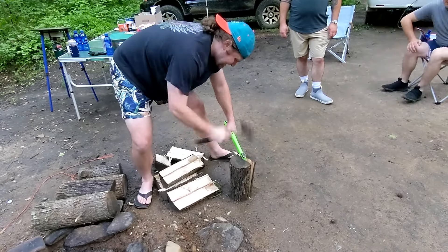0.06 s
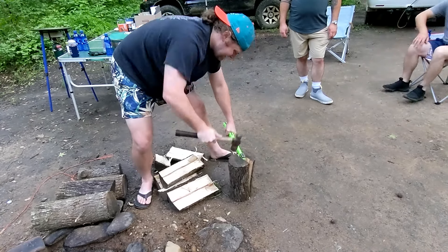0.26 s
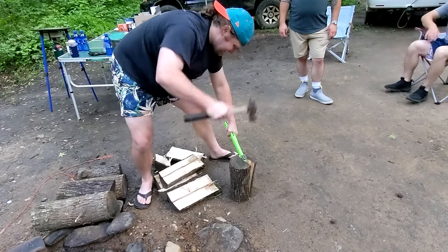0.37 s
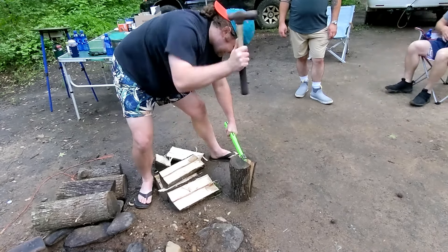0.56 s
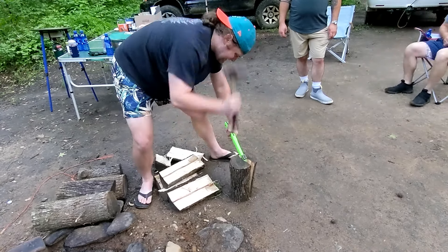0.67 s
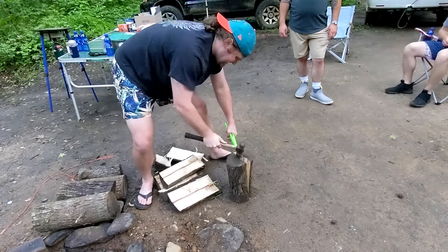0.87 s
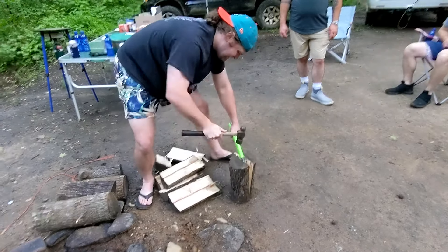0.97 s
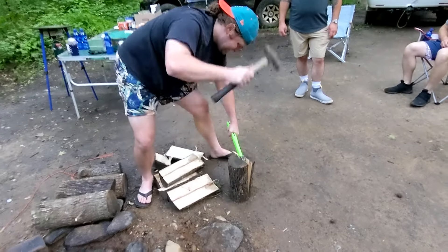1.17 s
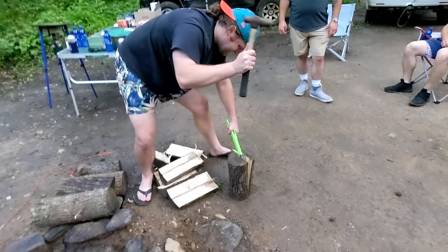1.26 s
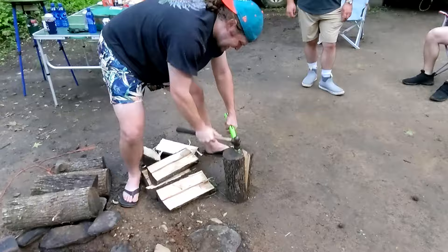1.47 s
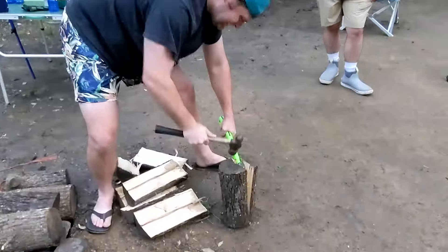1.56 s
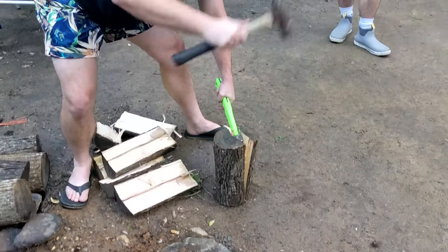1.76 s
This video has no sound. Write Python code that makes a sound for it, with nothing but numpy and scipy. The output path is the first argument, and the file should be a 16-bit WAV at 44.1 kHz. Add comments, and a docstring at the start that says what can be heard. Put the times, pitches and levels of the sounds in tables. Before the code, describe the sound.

Three sharp hammer blows on a hatchet wedged in a log, evenly spaced, echoing off vehicles and trees; dull microphone bumps on the left before the last blow, over soft forest hiss.

```python
"""A campsite among trees: a hammer hits the back of a hatchet stuck in a log three times.
Each blow is a shaped noise crack that excites damped modes, with a knock of the log and a ground thud.
Parked vehicles slap it back, camp objects scatter it early and the forest returns a long wash.
Between the last two blows the hand-held phone is bumped and rubbed near its left microphone:
filtered pushes and short noise. A faint knock follows the last blow, over a steady forest hiss."""
import sys
import numpy as np
from scipy import signal
from scipy.fft import rfft, irfft
from scipy.io import wavfile
from scipy.ndimage import uniform_filter1d, minimum_filter1d

SR = 44100
rng = np.random.default_rng(int(sys.argv[2]) if len(sys.argv) > 2 else 0)


def wav_record(signal):
    """Record a signal, one row per channel, as 16-bit PCM in the file named by sys.argv[1]."""
    frames = np.transpose(np.atleast_2d(signal))
    bounded = np.clip(frames, -1, 1)
    # unit amplitude maps onto the largest positive 16-bit level
    quanta = np.round(bounded * 32767).astype(np.int16)
    wavfile.write(sys.argv[1], SR, quanta)


N = 79380
T = np.arange(N) / SR  # time axis, s


def undb(db):
    """Level law: decibels to an amplitude ratio."""
    return 10 ** (np.asarray(db) / 20)


def sides(db):
    """Intensity stereophony: left and right gains for a level difference, positive to the left."""
    return undb(np.array([[.5], [-.5]]) * db)


def unit(x):
    """Energy normalisation of each channel."""
    return x / np.sqrt(np.sum(x ** 2, axis=-1, keepdims=True))


def colour(x, points, tilt_db=0, depth=1):
    """Minimum-phase filtering through (Hz, dB) points scaled by depth, plus a tilt in dB per octave."""
    size = 2 * N
    octave = np.log2(np.maximum(np.fft.rfftfreq(size, 1 / SR), 1))
    hz, db = np.array(points, float).T
    tilt = tilt_db * np.clip(octave - np.log2(2500), -2, 2)
    curve = depth * np.interp(octave, np.log2(hz), db) + tilt
    # folding the cepstrum onto positive time makes the filter causal
    cepstrum = irfft(np.log(undb(curve)))
    cepstrum[1:N] *= 2
    cepstrum[N + 1:] = 0
    response = np.exp(rfft(cepstrum))
    return irfft(rfft(x, size) * response)[..., :N]


def burst(at, rise, fall, shape=1):
    """Transient white noise: swells to an instant and dies away, with an even spectrum."""
    # shape 1 = pointed swell, 2 = rounded
    env = np.exp(-np.maximum((at - T) / rise, (T - at) / fall) ** shape)
    x = rng.standard_normal(N) * env
    for _ in range(2):
        flattened = irfft(np.exp(1j * np.angle(rfft(x))), N)
        x = flattened * np.sqrt(env)
    return unit(x) * np.sqrt(np.sum(env ** 2))


def convolve(x, response):
    """Linear superposition: each instant of the sound starts its own copy of the response."""
    return signal.fftconvolve(np.atleast_2d(x), np.atleast_2d(response), axes=-1)[:, :N]


def knock(at, hz, width):
    """Impulse response of a well-damped body: a push, band-passed and then softened in the treble."""
    push = np.zeros(N)
    push[int(at * SR)] = -1
    band = signal.butter(2, [hz / width, hz * width], "band", fs=SR, output="sos")
    softness = signal.butter(2, hz * 2, fs=SR, output="sos")  # treble corner an octave above the pitch
    x = signal.sosfilt(softness, signal.sosfilt(band, push))
    return x / np.abs(x).max()


# spectrum of the forest hiss: (frequency [Hz], relative level [dB])
AIR_SPECTRUM = [(20, -35), (50, -25), (90, -10), (150, -8), (250, -8.5), (380, -10), (580, -4), (800, -7),
                (1200, -3), (1900, -7), (2330, -0.5), (2700, -4), (3600, -7.5), (4400, -11), (5600, -13),
                (6800, -20.5), (8000, -37), (10200, -52), (16000, -88)]
AIR_DB, AIR_PAN_DB = -43.5, 2.5  # RMS level before panning; left over right
AIR_LIKENESS = 0.71  # amplitude of the noise common to both sides, relative to each side's own


def air():
    """Partial coherence: the soft, wide, even hiss of the forest shares some noise between the sides."""
    noise = rng.standard_normal((2, N)) + AIR_LIKENESS * rng.standard_normal(N)
    hiss = unit(colour(noise, AIR_SPECTRUM)) * np.sqrt(N)
    return hiss * undb(AIR_DB) * sides(AIR_PAN_DB)


# spectral weighting of the forest wash: (frequency [Hz], gain [dB])
FOREST_COLOUR = [(400, -21.5), (1200, -12), (1800, 0), (2300, 0), (3600, 3.5), (5800, 3), (7000, 1),
                 (9000, -1), (12000, -39)]
FOREST_DB, FOREST_PAN_DB = -9.5, 2
FOREST_HOLD_S, FOREST_T60_S = .13, 1.11  # steady part, then time to decay by 60 dB


def forest(x):
    """Multiple scattering: countless trunks return a diffuse wash that holds, then decays exponentially."""
    env = np.exp(-np.log(1000) * np.maximum(T - FOREST_HOLD_S, 0) / FOREST_T60_S)
    trunks = unit(rng.standard_normal((2, N)) * env)
    return colour(convolve(x, trunks), FOREST_COLOUR) * undb(FOREST_DB) * sides(FOREST_PAN_DB)


CAMP_DB, CAMP_FALL_S, CAMP_PAN_DB = -2.5, 0.032, 7  # level, decay time constant, left over right


def camp(x):
    """Early scattering from the ground, woodpile, table and chairs: a short exponential noise response."""
    scatter = unit(rng.standard_normal((2, N)) * np.exp(-T / CAMP_FALL_S))
    return convolve(x, scatter) * undb(CAMP_DB) * sides(CAMP_PAN_DB)


# spectral weighting of the vehicle echo: (frequency [Hz], gain [dB])
ECHO_COLOUR = [(400, -17.5), (1080, 3.5), (1700, 4), (2500, 3), (3600, 7), (5500, -1.5), (8000, -1),
               (12000, -0.5)]
ECHO_S, ECHO_RISE_S, ECHO_FALL_S, ECHO_PAN_DB = .0388, 0.0065, 0.01, 6.5  # delay, smear, left over right
SLAP_DB, SLAP_S = -2, 0.0016  # compact core, from a flat panel


def vehicles(x):
    """Specular and diffuse reflection: parked vehicles return a compact slap inside a smear of scatter."""
    echo = []
    for _ in range(2):
        smear = burst(ECHO_S, ECHO_RISE_S, ECHO_FALL_S)
        slap = undb(SLAP_DB) * 2 * burst(ECHO_S, SLAP_S, SLAP_S, 1.5)
        echo.append(smear + slap)
    return colour(convolve(x, unit(np.array(echo))), ECHO_COLOUR) * sides(ECHO_PAN_DB)


# spectrum of a scrape: (frequency [Hz], gain [dB])
SCRAPE_SPECTRUM = [(100, -26.5), (300, -17), (470, 5), (700, -12.5), (1050, -11), (1500, 0), (2100, -8.5),
                   (2600, -4.5), (3200, -15), (4000, -22), (9000, -59), (16000, -77)]


def scrape(at):
    """Friction noise: a brief filtered burst."""
    return colour(burst(at, rise=0.0018, fall=0.006), SCRAPE_SPECTRUM)


def tick():
    """Broadband transient: a faint woody knock after the last blow, far to the left."""
    return undb(-25) * scrape(1.706) * sides(18.5)


# spectrum of the hand's rub: (frequency [Hz], gain [dB])
RUB_SPECTRUM = [(30, -4.5), (70, 1), (150, 1.5), (400, 1), (800, -22), (3000, -25), (16000, -65.5)]


def rub():
    """Sliding friction: the hand's low noise swells and fades slowly."""
    return undb(-27.5) * colour(burst(1.2, rise=0.19, fall=0.15), RUB_SPECTRUM)


# bumps on the phone: (time [s], level [dB], pitch [Hz], scrape level [dB])
BUMPS = [(1.0417, -17.5, 255, -15), (1.068, -20.5, 355, -15.5), (1.1, -14.5, 335, -26),
         (1.165, -10.5, 306, -8.5), (1.195, -24.5, 251, -43), (1.2434, -32.5, 413, -18),
         (1.2613, -13, 470, -6.5)]
BUMP_WIDTH = 1.385  # band edges as a ratio to the pitch
BUMP_BASS_HZ, BUMP_BASS_DB = 97, -23  # bass level relative to a bump pitched at 300 Hz
BUMP_RIGHT_DB = -32  # right microphone relative to the left


def handling():
    """Structure-borne sound: dull bumps, scrapes and rub on the case, almost only on the left."""
    body = scrapes = 0
    for at, db, hz, scrape_db in BUMPS:
        # lower-pitched bumps carry more bass
        bass = undb(BUMP_BASS_DB) * (300 / hz) ** 2 * knock(at, BUMP_BASS_HZ, BUMP_WIDTH)
        body = body + undb(db) * (knock(at, hz, BUMP_WIDTH) + bass)
        scrapes = scrapes + undb(scrape_db) * scrape(at)
    return (body + scrapes + rub()) * undb(np.array([[0], [BUMP_RIGHT_DB]]))


THUD_HZ, THUD_DELAY_S, THUD_RISE_S = 83, 0.03, 0.0045


def thud(at):
    """Damped oscillation: the log pushes into the ground, a low tone that swells briefly and decays."""
    age = np.maximum(T - at - THUD_DELAY_S, 0)
    swell = age / THUD_RISE_S * np.exp(1 - age / THUD_RISE_S)
    return swell * np.sin(2 * np.pi * THUD_HZ * age)


# modes of hammer and hatchet: (frequency [Hz], gain over the crack [dB], 60 dB decay time [s])
MODES = [(1100, -1, 0.018), (1477, -1, 0.032), (1728, -4.5, 0.088), (1883, 6, 0.075), (2348, 6.5, 0.018),
         (2730, -1.5, .03), (2850, 0.5, 0.012), (3347, 1, 0.019), (3874, 8, 0.15), (4570, 0.5, 0.093),
         (5160, -16, .02), (5570, 2.5, 0.073), (6850, -19.5, 0.059), (2500, -5.5, .9)]
CONTACT_DB, CONTACT_T60_S = 3.5, 0.015  # brief ring of the steel faces


def steel_response(contact_hz):
    """Modal superposition: decaying cosines; the contact pitch depends on where the hammer lands."""
    ring = 0
    for hz, db, t60 in MODES + [(contact_hz, CONTACT_DB, CONTACT_T60_S)]:
        damping = np.log(1000) / t60
        gain = undb(db) * 2 * damping / SR  # peak gain is independent of decay time
        ring = ring + gain * np.exp(-damping * T) * np.cos(2 * np.pi * hz * T)
    return ring


# spectral weighting of the whole clack: (frequency [Hz], gain [dB])
CLACK_COLOUR = [(60, -68), (280, -54.5), (470, -34.5), (850, -19), (1150, -5), (2000, -2), (2600, -2.5),
                (3400, -1.5), (4100, -5), (5400, -2.5), (7100, -8), (7900, -24.5), (9100, -23),
                (10000, -44), (16000, -47)]
CRACK_DB, CRACK_SHAPE = -2, 1.21
SPLIT_DB, SPLIT_FALL_S = -25.5, 0.0064  # tearing fibres


def clack(at, tilt_db, rise, fall, contact_hz):
    """Impact excitation: the crack of steel on steel and of tearing fibres rings damped modes."""
    steel = undb(CRACK_DB) * burst(at, rise, fall, CRACK_SHAPE)
    fibres = undb(SPLIT_DB) * burst(at, rise, SPLIT_FALL_S)
    crack = steel + fibres
    ringing = convolve(crack, steel_response(contact_hz))[0]
    return colour(crack + ringing, CLACK_COLOUR, tilt_db)


# left-right contrast curve, scaled by a depth on each side: (frequency [Hz], unscaled contrast [dB])
LEFT_BIAS = [(300, -9), (1500, 7), (2600, 4.5), (4400, -21.5), (5500, 0), (6800, -36.5), (9000, -16.5)]


def microphones(near):
    """Spectral level difference: one curve weights the left and, inverted, the right."""
    left = colour(near[0], LEFT_BIAS, depth=0.28)
    right = colour(near[1], LEFT_BIAS, depth=-0.24)
    return np.array([left, right])


# blows: (time [s], level [dB], treble tilt [dB per octave], left over right [dB], echo send [dB],
# camp and forest send [dB], ground thud level [dB], log knock relative to the clack [dB],
# crack rise [s], crack fall [s], contact pitch [Hz])
BLOWS = [(0.1725, 8.04, -0.77, 3.3, -11, -4, -35, -29, 0.0014, 0.002, 1846),
         (0.8216, 0.79, 0.21, 10.5, -8, 1, -66, -38, 0.0021, 0.0023, 2360),
         (1.494, 4.5, -0.34, 11.4, -13, -1.5, -49, -26.5, 0.0014, 0.00235, 2510)]
LOG_HZ, LOG_WIDTH = 477, 1.314  # pitch; band edges as a ratio to it


def hammering():
    """Direct and reflected sound: blows and log knocks at both microphones, with thud, echo and wash."""
    near = to_vehicles = to_forest = low = 0
    for at, db, tilt_db, pan_db, echo_db, forest_db, thud_db, log_db, rise, fall, contact_hz in BLOWS:
        log = undb(log_db) * knock(at - rise, LOG_HZ, LOG_WIDTH)
        blow = undb(db) * (clack(at, tilt_db, rise, fall, contact_hz) + log)
        near = near + blow * sides(pan_db)
        to_vehicles = to_vehicles + blow * undb(echo_db)
        to_forest = to_forest + blow * undb(forest_db)
        low = low + undb(thud_db) * thud(at)
    reflected = vehicles(to_vehicles) + camp(to_forest) + forest(to_forest)
    return microphones(near) + low + reflected


def scene():
    """Superposition of all sources, from the background to the blows."""
    return air() + tick() + handling() + hammering()


def smooth_gain(gain, size):
    """Look-ahead gain control: hold the minimum over a window of samples, then round the corners."""
    return uniform_filter1d(minimum_filter1d(gain, size=size), size=size)


LIMIT_DB, LIMIT_SHARE, RELEASE_DB_PER_S = -3, 0.5, 42  # threshold, part of the excess removed, recovery
TOP_HZ = 16300


def record(dry):
    """Dynamic compression: the phone's gain ducks on loud peaks, a fast limiter follows, the top is cut."""
    level_db = 20 * np.log10(np.abs(dry).max(axis=0) + 1e-9)
    over = np.maximum(level_db - LIMIT_DB, 0) * LIMIT_SHARE
    recovery = RELEASE_DB_PER_S * T
    duck = np.maximum.accumulate(over + recovery) - recovery
    x = dry * smooth_gain(undb(-duck), size=133)
    # the limiter holds each channel within full scale before the low-pass
    x = x * smooth_gain(1 / np.maximum(np.abs(x), 1), size=21)
    return signal.sosfilt(signal.ellip(8, .2, 70, TOP_HZ, fs=SR, output="sos"), x)


dry = scene()
out = record(dry)
wav_record(out)
```